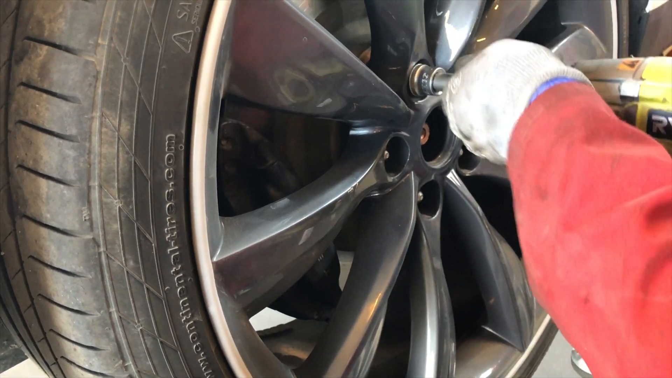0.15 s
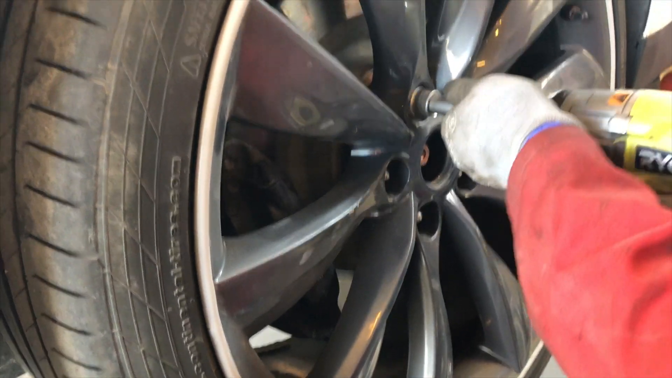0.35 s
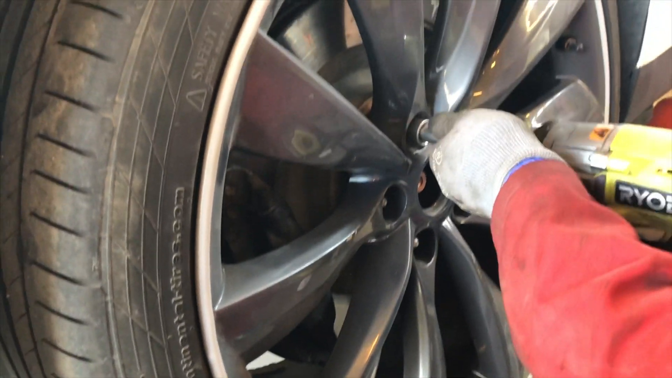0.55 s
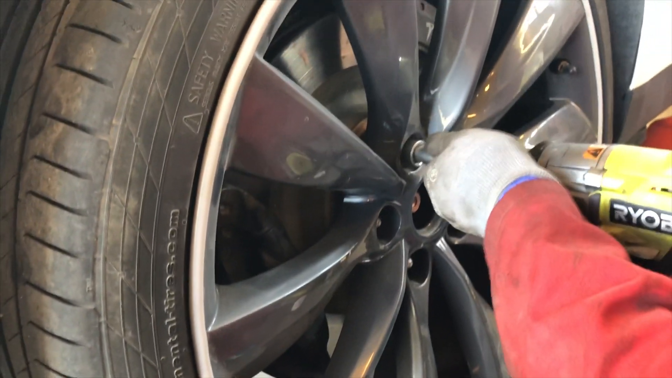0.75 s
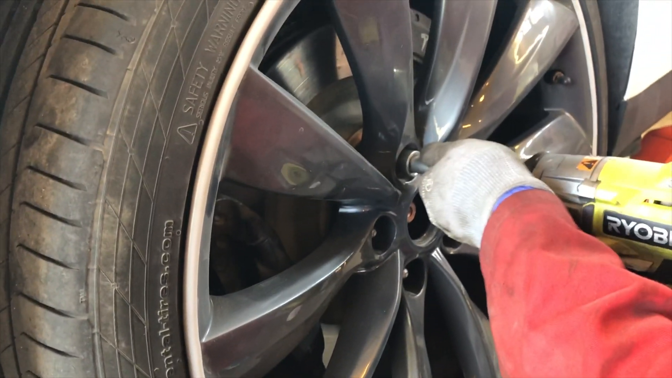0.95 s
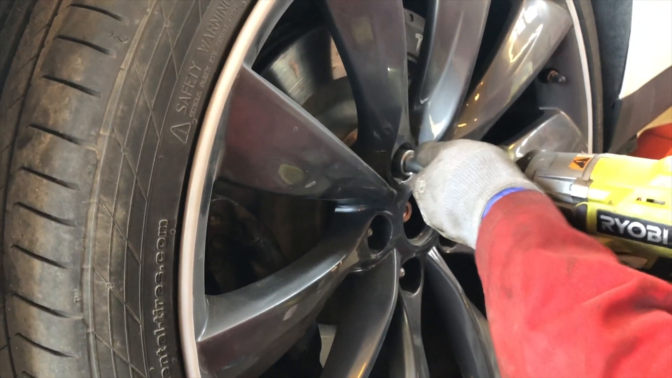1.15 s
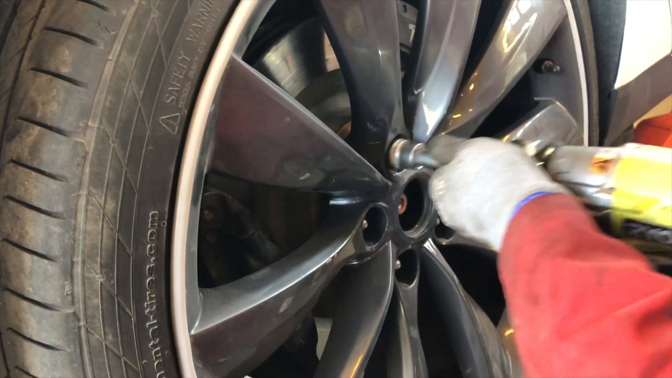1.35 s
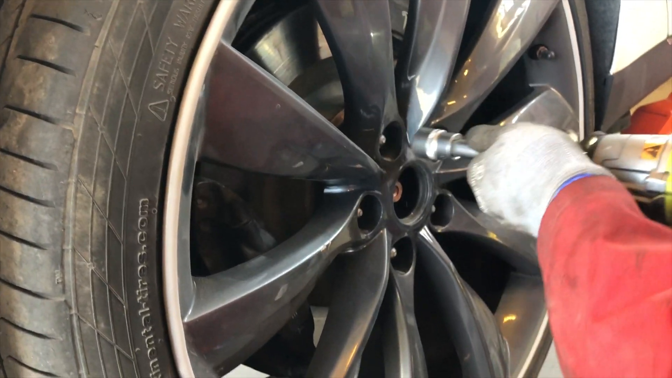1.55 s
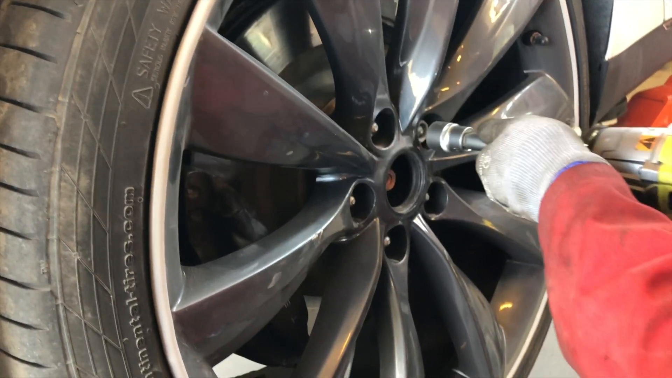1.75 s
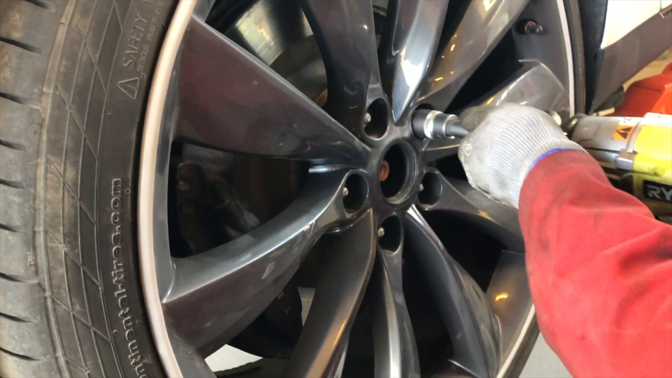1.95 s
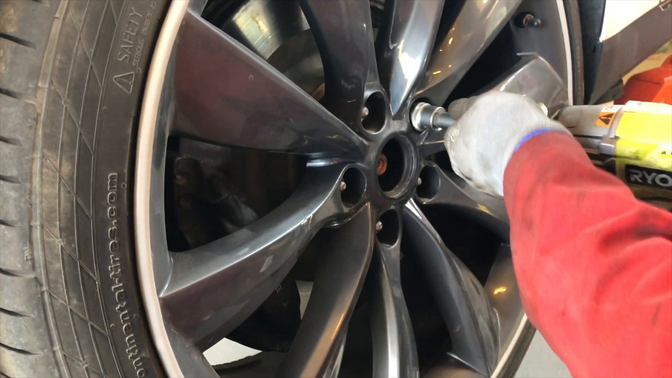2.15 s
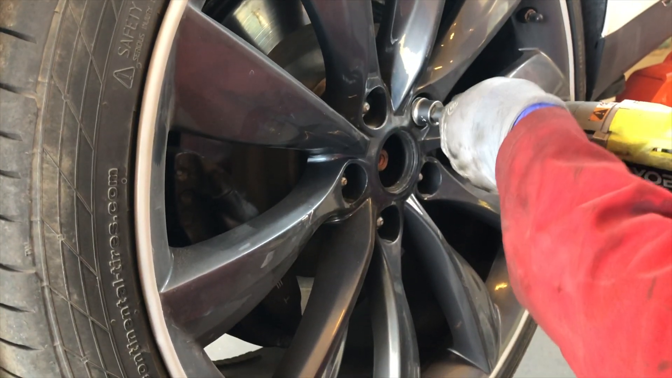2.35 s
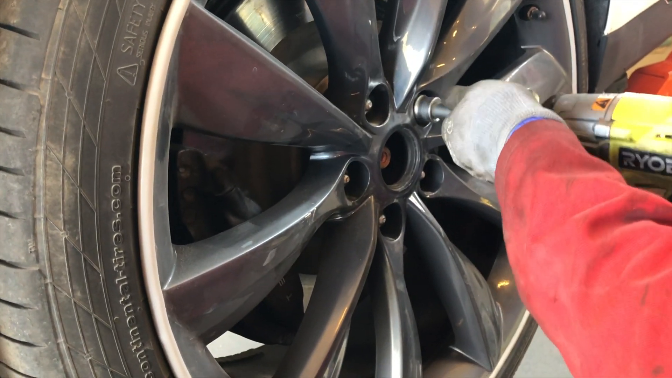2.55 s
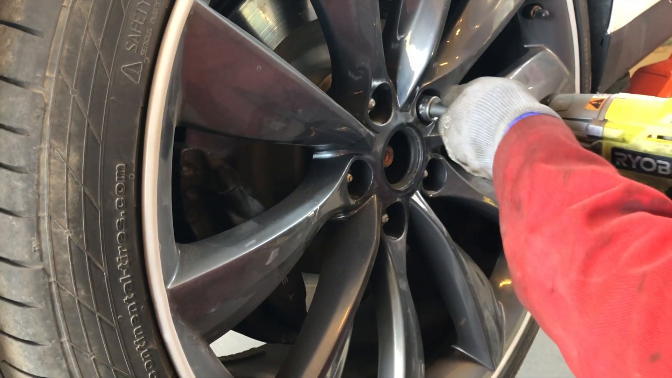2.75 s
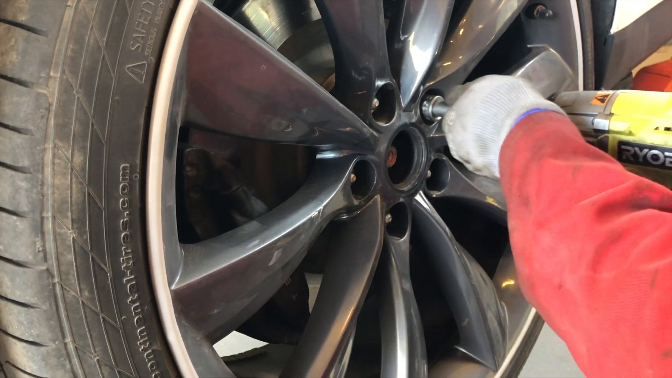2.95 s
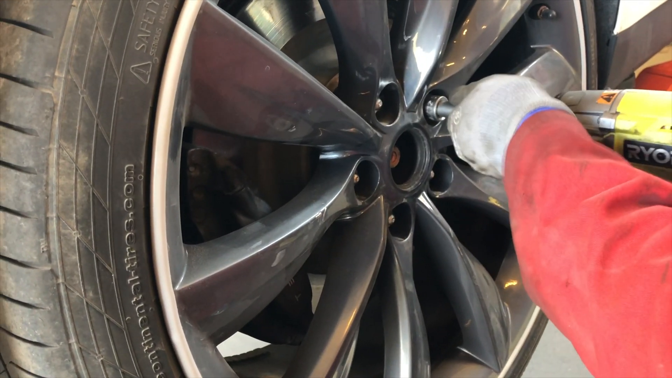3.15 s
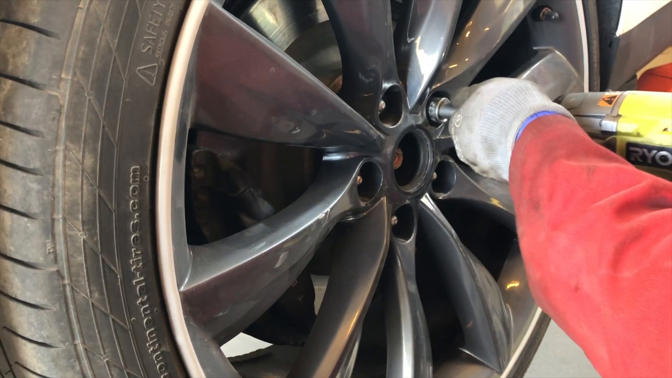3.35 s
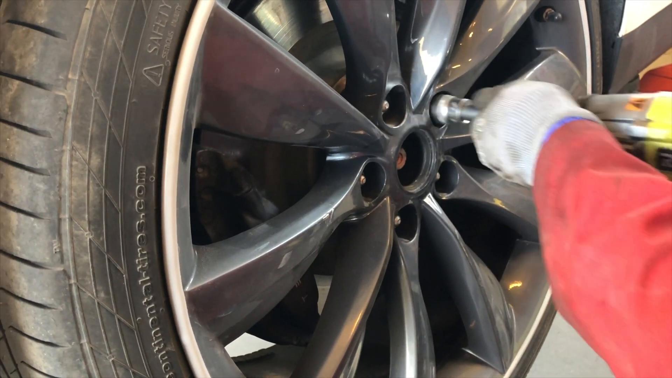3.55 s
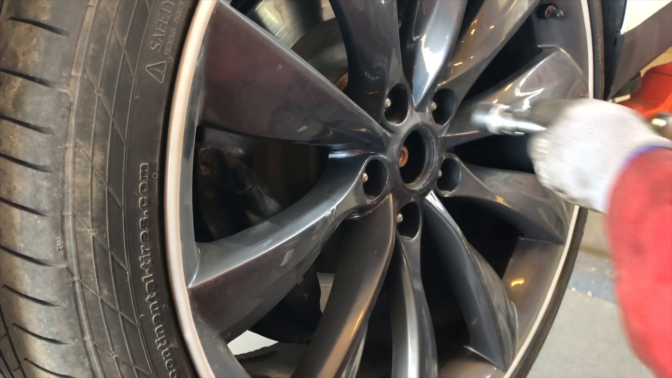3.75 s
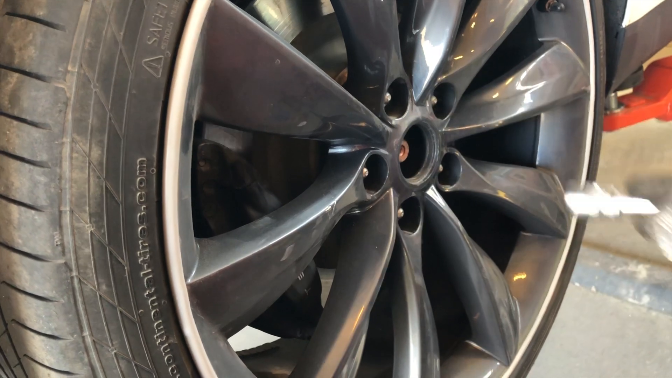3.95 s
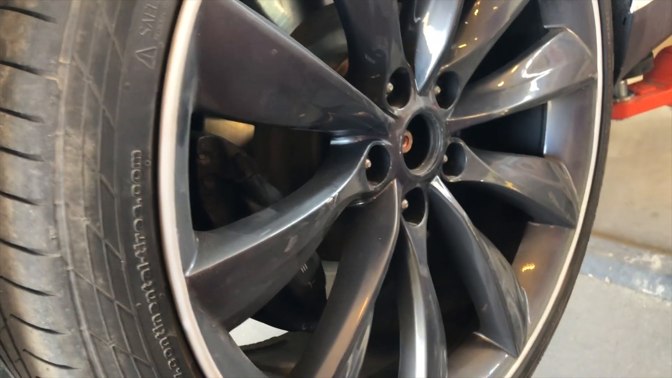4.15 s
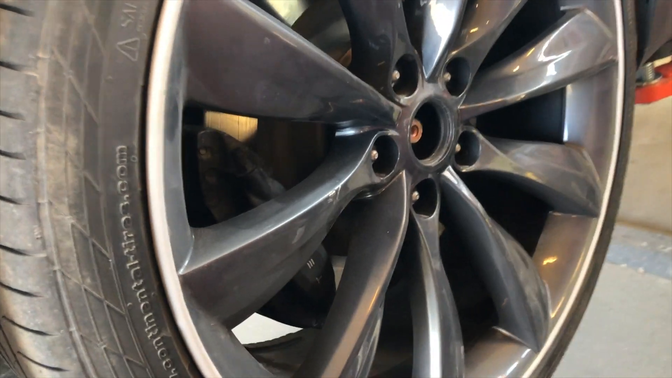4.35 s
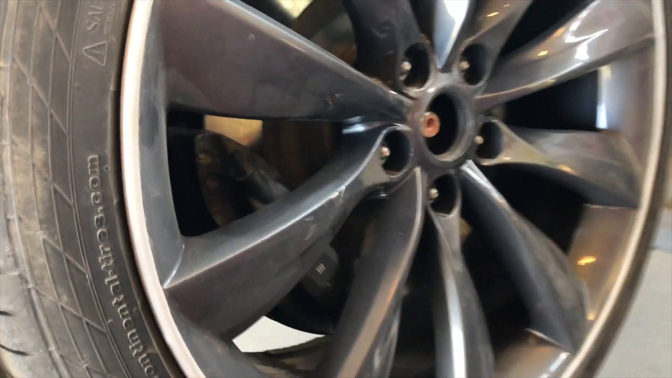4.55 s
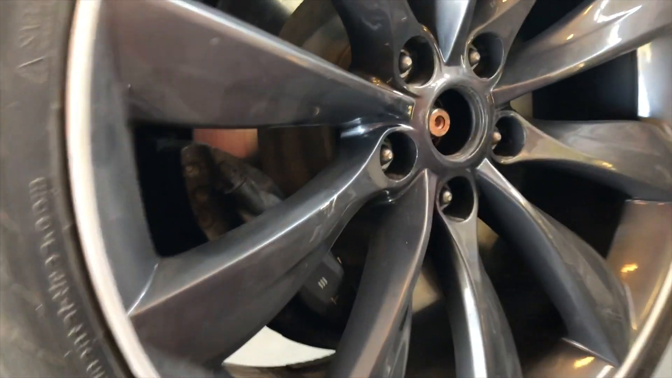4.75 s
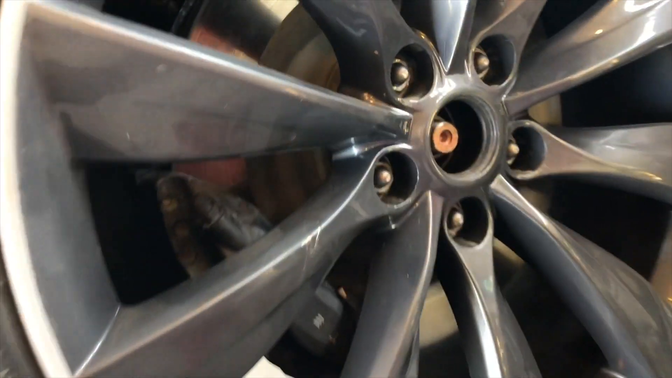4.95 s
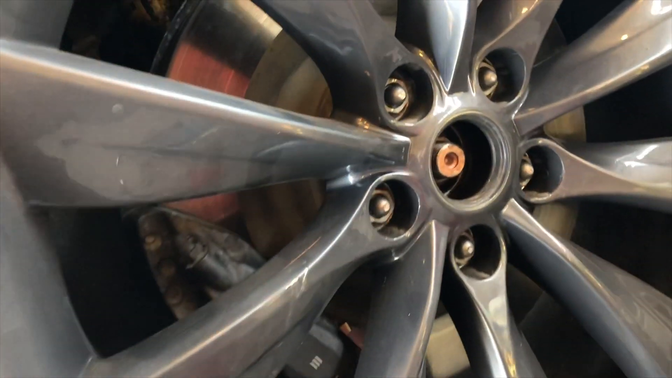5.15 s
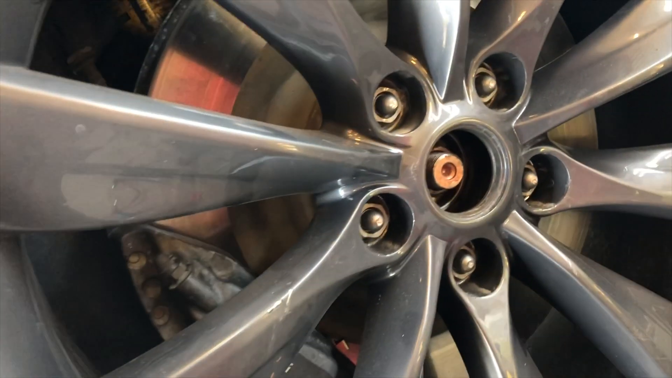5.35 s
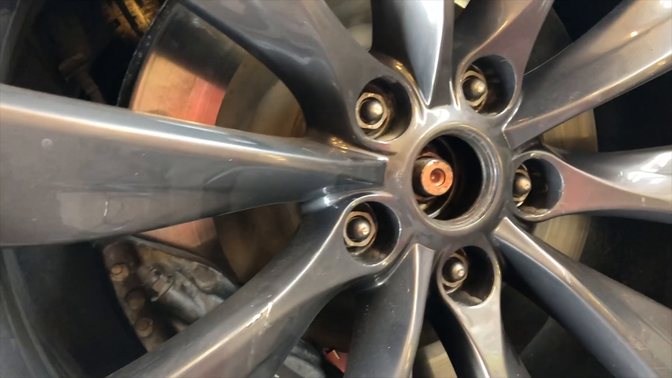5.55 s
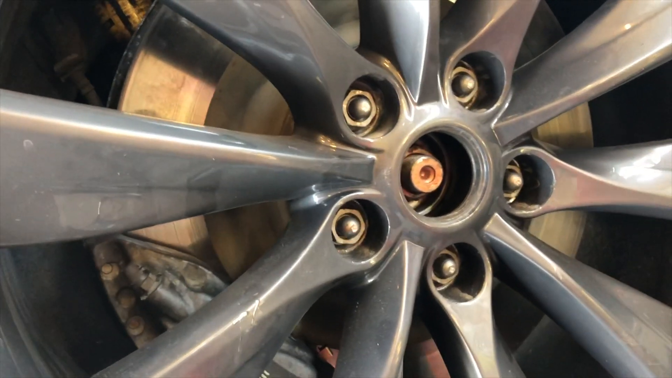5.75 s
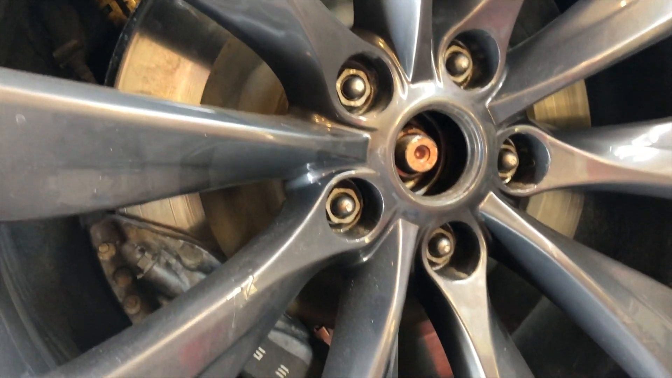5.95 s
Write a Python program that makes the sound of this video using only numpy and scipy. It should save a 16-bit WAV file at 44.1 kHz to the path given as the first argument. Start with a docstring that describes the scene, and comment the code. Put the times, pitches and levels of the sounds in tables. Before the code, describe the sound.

In an echoing garage, a socket ticks on a lug nut close to the microphone. A cordless impact wrench whines up, then hammers rapidly, steel on steel, with deep thumps where the blows overload the microphone. The room rings out and a second nut is tightened the same way. Afterwards sleeves rustle faintly and the tool is put down with a clack over a low workshop hum.

```python
"""An echoing garage, one microphone close to an alloy wheel, a low workshop hum behind it.
A socket ticks on a lug nut; the motor of a cordless impact wrench whines up and spins the nut home.
Its hammer then pounds the nut tight, about 55 steel blows a second; some overload the microphone
with a deep thump. The room rings out and a second nut follows. Afterwards sleeves rustle and the
tool is put down with a clack."""
import sys
import numpy as np
from scipy import signal
from scipy.fft import rfft, irfft
from scipy.io import wavfile

SR = 44100
rng = np.random.default_rng(int(sys.argv[2]) if len(sys.argv) > 2 else 0)


def wav_record(signal):
    """Record a signal, one row per channel, as 16-bit PCM in the file named by sys.argv[1]."""
    frames = np.transpose(np.atleast_2d(signal))
    bounded = np.clip(frames, -1, 1)
    # unit amplitude maps onto the largest positive 16-bit level
    quanta = np.round(bounded * 32767).astype(np.int16)
    wavfile.write(sys.argv[1], SR, quanta)


N = 268915
TIME = np.arange(N) / SR


def from_db(db):
    """Decibels to gain."""
    return 10 ** (np.asarray(db) / 20)


def at_hz(points, hz):
    """Read a table on a log-frequency axis."""
    freqs, values = np.transpose(points)
    return np.interp(np.log(np.maximum(hz, 1)), np.log(freqs), values)


def add(out, s, sound):
    """Mix a sound in at s seconds."""
    start = round(s * SR)
    out[start:start + len(sound)] += sound[:N - start]


def coloured(x, spectrum, resonances=(), size=8192):
    """Minimum-phase filter of unit power: a colour with resonant peaks on top.
    Each row of a colour: frequency in Hz, relative density in dB.
    Each row of resonances: centre in Hz, width in Hz, lift in dB."""
    hz = np.fft.rfftfreq(size, 1 / SR)
    gain = from_db(at_hz(spectrum, hz))
    for centre, width, lift_db in resonances:
        gain *= np.sqrt(1 + (from_db(lift_db) ** 2 - 1) / (1 + (2 * (hz - centre) / width) ** 2))
    cepstrum = irfft(np.log(gain))[:size // 2]
    cepstrum[1:] *= 2
    response = irfft(np.exp(rfft(cepstrum, size)))
    return signal.oaconvolve(x, response / np.linalg.norm(response))[:N]


def noise(spectrum):
    """Steady noise of a given colour, rms 1."""
    return coloured(rng.standard_normal(N), spectrum)


def drift(rate_hz):
    """A random wander with a spread of about 1."""
    knots = rng.standard_normal(N // 10)
    return np.interp(TIME * rate_hz, np.arange(len(knots)), knots)


def strikes(rows, rise_s, t60, alike, size=8192):
    """Each contact wakes a dense crowd of metal modes, partly the same ones every time."""
    out, age = np.zeros(N), np.arange(size) / SR
    envelope = (1 - np.exp(-age / rise_s)) * from_db(-60 * age / t60)
    shared = rng.standard_normal(size)
    for s, db in rows:
        crowd = np.sqrt(alike) * shared + np.sqrt(1 - alike) * rng.standard_normal(size)
        add(out, s, from_db(db) * envelope * crowd)
    return out


def strokes(rows, ends_db=-9, rise_share=.43):
    """Gain over time of rubbing strokes, each swelling to its top and fading."""
    gain = np.zeros(N)
    for top_s, length_s, db in rows:
        along = (TIME - top_s) / length_s
        from_top = np.maximum(-along / rise_share, along / (1 - rise_share))
        gain += from_db(np.maximum(db + ends_db * from_top, -200))
    return gain


# Room tone as the recorder's gain control leaves it. Each row: time in seconds, level in dB.
DUCKED_LEVEL = [(0, -52.5), (.3, -56.5), (2.05, -68), (2.3, -59), (2.5, -62), (4.0, -68.5), (4.55, -60),
                (5.3, -59.5), (5.6, -54.5), (6.1, -54)]
# The rumble's colour. Each row: frequency in Hz, relative density in dB.
RUMBLE_COLOUR = [(16, -44.5), (28, -19.5), (50, -2), (87, -2.5), (125, -2), (240, -3), (359, -8.5),
                 (561, -8), (789, -10.5), (1080, -11), (1560, -14.5), (2790, -23.5), (3820, -29),
                 (5240, -28.5), (6470, -36.5), (15000, -41.5)]

def workshop_rumble():
    """Dull workshop noise, ducked by the recorder's gain control during the hammering, then recovering."""
    return from_db(np.interp(TIME, *np.transpose(DUCKED_LEVEL))) * noise(RUMBLE_COLOUR)


# A hum in the background, strongest near the end. Each row: time in seconds, level in dB.
HUM_SWELL = [(0, -64), (.3, -69), (1.5, -80.5), (4.5, -79.5), (4.95, -65), (5.6, -57), (6.1, -67)]

def workshop_hum(hz=115, octave_db=-7.5, waver=.072, flicker_db=3):
    """A low tone and its octave, unsteady in pitch and level."""
    phase = 2 * np.pi * np.cumsum(hz * (1 + waver * drift(32))) / SR
    tone = np.sqrt(2) * (np.sin(phase) + from_db(octave_db) * np.sin(2 * phase))
    return tone * from_db(np.interp(TIME, *np.transpose(HUM_SWELL)) + flicker_db * drift(36))


# How long the garage rings. Each row: frequency in Hz, t60 in seconds.
GARAGE_T60 = [(150, .95), (550, 1.7), (1400, 2.0), (4000, 1.7), (5500, 1.25), (7000, .85), (10000, .55),
              (15000, .4)]
# Its echo at the microphone. Each row: frequency in Hz, level against the direct sound in dB.
GARAGE_ECHO = [(100, -31.5), (400, -12.5), (800, -15.5), (1600, -15), (2800, -16), (4300, -22.5),
               (7000, -23), (15000, -29.5)]

def garage(x, build_s=.005, size=65536):
    """Diffuse echo that builds quickly and dies band by band, the treble first."""
    age, hz = np.arange(size) / SR, np.fft.rfftfreq(size, 1 / SR)
    white, response = rfft(rng.standard_normal(size)), np.zeros(size)
    edges = np.geomspace(100, 17000, 40)
    for low, high in zip(edges, edges[1:]):
        centre = np.sqrt(low * high)
        fade = from_db(-60 * age / at_hz(GARAGE_T60, centre)) * (1 - np.exp(-age / build_s))
        band = irfft(white * ((hz >= low) & (hz < high)), size)
        response += from_db(at_hz(GARAGE_ECHO, centre)) * band * fade / np.linalg.norm(fade)
    return signal.fftconvolve(x, response)[:N]


# Cloth, then scuffs, after the second nut. Each row: top and length in seconds, relative level in dB.
SLEEVE_STROKES = [(4.29, 0.04, -66), (4.49, 0.073, -66), (4.94, 0.16, -68), (5.165, 0.058, -70),
                  (5.355, 0.16, -64), (5.52, .16, -61.5), (5.67, 0.025, -68), (5.89, .3, -61.5)]
SCUFF_STROKES = [(5.803, 0.019, -47), (5.851, 0.02, -38.5), (5.94, 0.17, -54.5)]
# Their colours. Each row: frequency in Hz, relative density in dB.
SLEEVE_COLOUR = [(300, -18), (1200, -4.5), (3000, 1), (5500, -5.5), (9000, -11), (15000, -16)]
SCUFFING_COLOUR = [(500, -62.5), (850, -29.5), (1460, -24), (1820, -11), (2150, -12), (3090, -6),
                   (6310, -25), (7350, -25), (9970, -33), (14000, -34)]

def rubbing():
    """Sleeves and gloves rub with a grainy rustle; a few short scuffs stand out."""
    cloth = from_db(5.5) * strokes(SLEEVE_STROKES) * noise(SLEEVE_COLOUR) * from_db(3.3 * drift(250))
    scuffs = strokes(SCUFF_STROKES) * noise(SCUFFING_COLOUR) * from_db(4.7 * drift(330))
    return cloth + scuffs


# The tool handled nearby, and put down. Each row: start in seconds, relative level in dB.
TICKS = [(.106, -40), (.2245, -43.5), (2.14, -50), (2.246, -44), (2.294, -41), (2.482, -46), (4.153, -50),
         (4.53, -47.5), (4.596, -46), (5.11, -48), (5.215, -44), (5.3, -46), (5.65, -45.5), (5.693, -47)]
CLACK = [(5.343, -30)]
# Their colours. Each row: frequency in Hz, relative density in dB.
TICK_COLOUR = [(400, -4), (1600, 3.5), (3200, -1.5), (6500, -7), (10000, -17), (15500, -12.5)]
CLACK_COLOUR = [(120, -40.5), (210, -17), (437, -16.5), (707, 2.5), (846, -17), (1470, 5), (2650, -15),
                (2900, -6), (3530, -25), (4450, 4), (5050, -7), (6480, -2.5), (7210, -13), (9600, -13),
                (15000, -26)]

def handling():
    """Light touches of socket and tool tick; the tool lands with a longer clack."""
    ticks = coloured(strikes(TICKS, rise_s=.00024, t60=.021, alike=.14), TICK_COLOUR)
    clack = coloured(strikes(CLACK, rise_s=.00076, t60=.13, alike=.11), CLACK_COLOUR)
    return from_db(-4.5) * ticks + from_db(-7.5) * clack


# Snaps from inside the wrench. Each row: start in seconds, relative level in dB.
SLACK_SNAPS = [(0.2836, -20.5), (0.2931, -2.5), (1.2923, -2.5), (1.3251, -4), (2.5387, -28), (2.555, -13),
               (3.4883, -1), (3.5178, -4), (3.5563, 0.5), (3.572, -1.5)]
# Each row: frequency in Hz, relative density in dB.
SLACK_COLOUR = [(180, -56), (300, -32), (687, -20.5), (2050, -5), (3540, -9), (4310, -3), (5010, -9.5),
                (7700, -10), (8370, -6.5), (8940, -10), (13800, -9), (15700, -23)]

def drive_slack():
    """Slack in the drive snaps shut as the motor starts and brakes."""
    return from_db(-6) * coloured(strikes(SLACK_SNAPS, rise_s=.00021, t60=.027, alike=.07), SLACK_COLOUR)


# Gear and fan tones, close up. Each row: multiple of the rotor rate, relative level in dB.
WHINE_TONES = [(1, -22), (6, -21), (12, -24), (15, -9), (25, -23)]
# Gearcase modes that flare as a tone sweeps through. Each row: centre and width in Hz, lift in dB.
GEARCASE_MODES = [(1740, 180, 15), (2850, 260, 15), (5350, 400, 5)]
# Rush of fan, brushes and gears. Each row: frequency in Hz, relative density in dB.
RUSH_COLOUR = [(53, -50.5), (90, -19.5), (114, -1), (161, -19.5), (336, -8.5), (391, -14), (485, -3.5),
               (615, -21), (1370, -5), (2500, -5), (3770, -6), (5220, -9), (5690, -7.5), (14400, -9.5),
               (15700, -7)]

def motor(run, times, release_s, kick_hz=89.1, spin_up_s=.056, brake_s=.085, turns_per_blow=4.5):
    """Gear tones over a rush of air grow with speed; hammering shakes the speed and chokes the tones."""
    start_s, free_hz, free_db, loaded_db, _ = run
    age = np.maximum(TIME - start_s, 0)
    load = np.interp(TIME, [times[0] - .012, times[0] + .01], [0, 1])
    # The rotor jerks into motion, nears its free speed, and brakes when the trigger is let go.
    lag = np.exp(-age / spin_up_s)
    spin_hz = free_hz + (kick_hz - free_hz) * lag
    loaded_hz = np.interp(TIME, times[:-2], turns_per_blow / np.diff(times[:-1]))
    brake = np.exp(-(np.maximum(TIME - release_s, 0) / brake_s) ** 2) + 1e-9
    shudder = (.0043 + .06 * lag) * drift(200)
    sag = .093 * load * (drift(220) - 1)
    rotor_hz = ((1 - load) * spin_hz + load * loaded_hz) * brake * (1 + shudder + sag)
    phase = 2 * np.pi * np.cumsum(rotor_hz) / SR
    tones = sum(from_db(db) * np.sqrt(2) * np.sin(order * phase) for order, db in WHINE_TONES)
    flicker = from_db((2.5 + 8 * lag) * drift(110))
    whine = coloured(tones, [(100, 0), (16000, 0)], GEARCASE_MODES) * flicker
    rush = noise(RUSH_COLOUR) * (1 + .27 * np.sin(phase)) * from_db(2 * drift(320))
    speed_decades = np.log10(spin_hz / free_hz * brake)
    seating_db = 5.5 * np.exp(np.minimum(TIME - times[0], 0) / .019)   # a lift as the nut seats
    level_db = (1 - load) * (free_db + seating_db) + load * loaded_db + 30 * speed_decades
    whine_db = -.5 - 8 * load + 19.5 * speed_decades
    return (age > 0) * from_db(level_db) * (from_db(-2) * rush + from_db(whine_db) * whine)


# Bouts of deep thumps under the blows. Each row: start and end in seconds, relative level in dB.
DEEP_BOUTS = [(.547, .577, -24.5), (.625, .692, -33.5), (.726, .849, -13.5), (.867, .902, -16.5),
              (.938, 1.084, -17), (1.121, 1.29, -15), (2.767, 2.847, -17), (2.864, 2.916, -15),
              (2.933, 2.969, -16), (2.986, 3.114, -16), (3.133, 3.17, -16.5), (3.261, 3.299, -13),
              (3.3, 3.373, -24.5), (3.391, 3.485, -11.5), (3.495, 3.52, -22.5)]
# A thump as its pitch falls. Each row: pitch in Hz, relative level in dB.
CHIRP_LEVEL = [(17, -58.5), (26, -20.5), (45, -19.5), (85, -5), (130, -8), (190, -8), (260, -5), (360, 0),
               (560, 0.5), (820, -0.5), (1450, -11)]

def thumps(times, turns=1.55, onset_s=.00107, weak_db=-39.5, scatter_db=3.5, size=4096):
    """The hardest blows overload the microphone, giving a deep thump that drops quickly in pitch."""
    out, age = np.zeros(N), np.maximum(np.arange(size) / SR, onset_s)
    chirp = np.sin(2 * np.pi * turns * np.log(age / onset_s)) * from_db(at_hz(CHIRP_LEVEL, turns / age))
    for k, s in enumerate(times):
        thump_db = next((db for start, end, db in DEEP_BOUTS if start <= s < end), weak_db)
        direction = (-1) ** k   # the two blows in a turn of the hammer push opposite ways
        add(out, s, direction * from_db(thump_db + scatter_db * rng.standard_normal()) * chirp)
    return from_db(4) * out


# Wheel and socket sing on at the second nut. Each row: pitch in Hz, relative level in dB, t60 in seconds.
WHEEL_MODES = [(705, -48, 1.6), (6950, -32, .1), (11816, -38, .5)]

def wheel_ring(blows, size=65536):
    """A few lightly damped modes gather energy from every blow."""
    kicks, age = np.zeros(N), np.arange(size) / SR
    for s, db in blows:
        add(kicks, s, from_db([db]))
    ring = sum(from_db(db - 60 * age / t60) * np.sin(2 * np.pi * hz * age) for hz, db, t60 in WHEEL_MODES)
    return signal.fftconvolve(kicks, ring)[:N]


# Steel on steel at close range. Each row: frequency in Hz, relative density in dB.
CRACK_COLOUR = [(200, -21), (700, -10.5), (1300, -2), (2000, -4), (3000, -2.5), (5000, -0.5), (8000, 1.5),
                (11000, -1), (14000, -3.5), (16000, -10)]

def hammer(blows, resonances, recoil_s=.0135, recoil_db=-17):
    """The hammer hits the anvil, springs back and rattles onto its cam before the next blow."""
    cracks = strikes(blows, rise_s=.00015, t60=.018, alike=.25)
    unevenness = rng.standard_normal((len(blows), 2)) * [.001, 2]   # seconds, dB
    rattles = strikes(blows + [recoil_s, recoil_db] + unevenness, rise_s=.00095, t60=.012, alike=.089)
    return from_db(8.5) * coloured(cracks + rattles, CRACK_COLOUR, resonances)


def blow_times(first_s, first_gap_s, settling_blows, release_s, last_s, settled_gap_s=.01854):
    """The hammer slows to a steady beat as the nut tightens, and lands once more as the motor coasts."""
    gaps = settled_gap_s + (first_gap_s - settled_gap_s) * np.exp(-np.arange(60) / settling_blows)
    times = first_s + np.cumsum(gaps) - gaps
    return np.append(times[times < release_s], last_s)


# The motor at each nut. Each row: trigger pull in seconds, free rotor rate in Hz, then relative
# levels in dB running free, under load and of the blows.
MOTOR_RUNS = [(.283, 366, -18, -23, -11.5), (2.538, 358, -22.5, -21.5, -9.5)]
# The hammer at each nut. Each row: first blow and first gap in seconds, settling constant in blows,
# trigger release and last blow in seconds.
HAMMER_RUNS = [(.5391, .01494, 10.85, 1.285, 1.3146), (2.7452, .01433, 6.8, 3.482, 3.5078)]
# Socket and wheel resonances at each nut. Each row: centre and width in Hz, lift in dB.
FIRST_NUT_MODES = [(1301.5, 93, 8), (1646, 61, 8.5), (2538, 65, 8.5), (4292, 380, 10.5), (6950, 290, 5),
                   (7470, 150, 5.5), (8800, 100, 5)]
SECOND_NUT_MODES = [(1623, 64, 11.4), (2812, 1100, 3.4), (4260, 280, 6.5), (6955, 130, 9), (8730, 220, 5),
                    (10200, 200, 2.9), (11660, 1300, 5.6)]

def tighten(nut, resonances, jitter_s=.0002, scatter_db=2.9):
    """One nut is spun home and hammered tight: gives the tool's sound and its blows (seconds, dB)."""
    run, pounding = MOTOR_RUNS[nut], HAMMER_RUNS[nut]
    crack_db, release_s = run[-1], pounding[-2]
    times = blow_times(*pounding)
    blows = np.column_stack([times, np.full(len(times), crack_db)])
    blows += rng.standard_normal(blows.shape) * [jitter_s, scatter_db]
    return motor(run, times, release_s) + hammer(blows, resonances), blows


def scene():
    """One microphone: the wrench close by, the garage around it; thumps and background stay dry."""
    first_nut, first_blows = tighten(0, FIRST_NUT_MODES)
    second_nut, second_blows = tighten(1, SECOND_NUT_MODES)
    direct = first_nut + second_nut + wheel_ring(second_blows) + drive_slack() + handling() + rubbing()
    echo = garage(direct)
    low_end = thumps(first_blows[:, 0]) + thumps(second_blows[:, 0])
    return (direct + echo + low_end + workshop_hum() + workshop_rumble())[None]


def record(dry, ceiling=.54, cutoff_hz=15950):
    """Peaks are rounded and the highest treble is cut."""
    low_pass = signal.ellip(12, .1, 80, cutoff_hz, fs=SR, output="sos")
    return signal.sosfilt(low_pass, ceiling * np.tanh(dry / ceiling))


dry = scene()
out = record(dry)
wav_record(out)
```